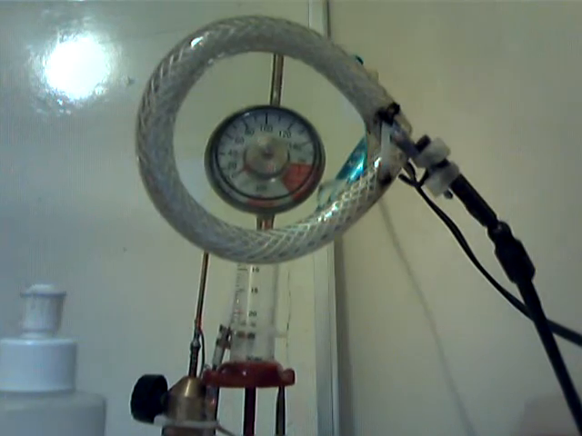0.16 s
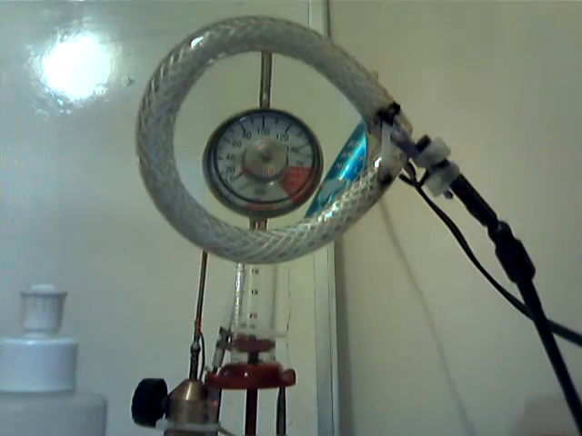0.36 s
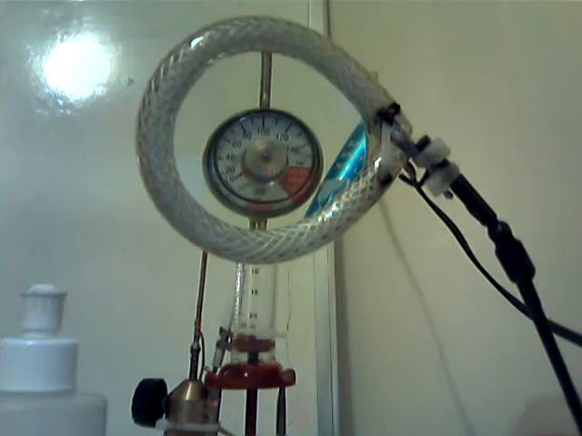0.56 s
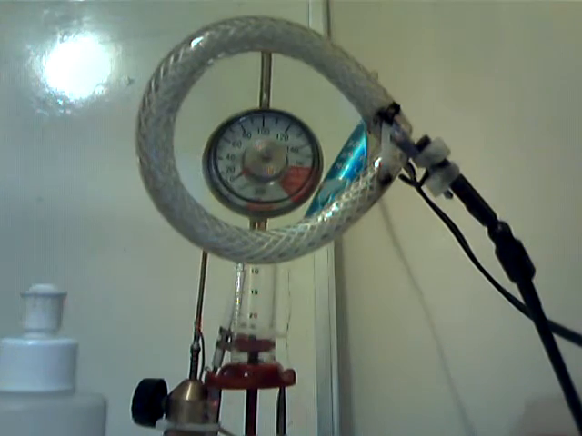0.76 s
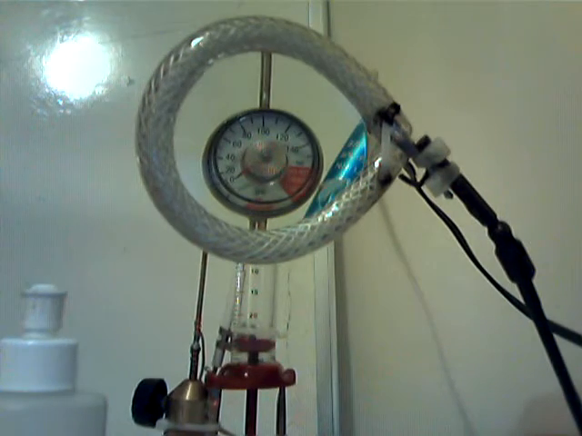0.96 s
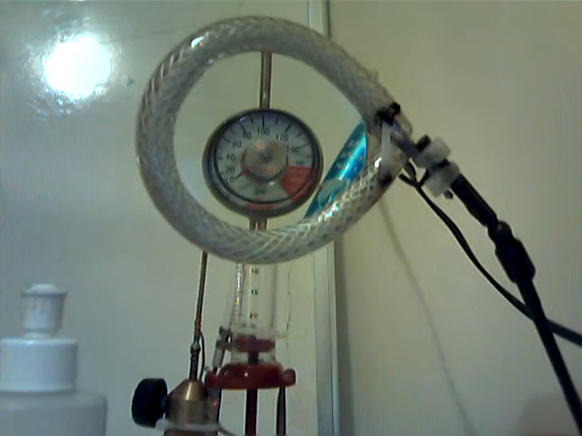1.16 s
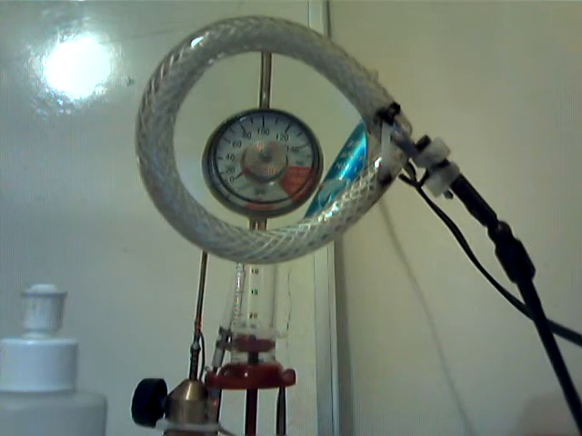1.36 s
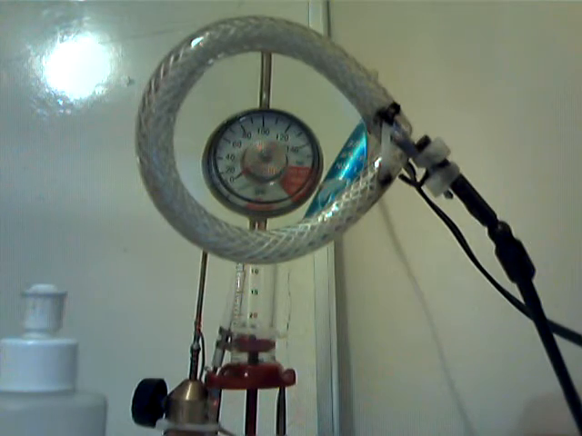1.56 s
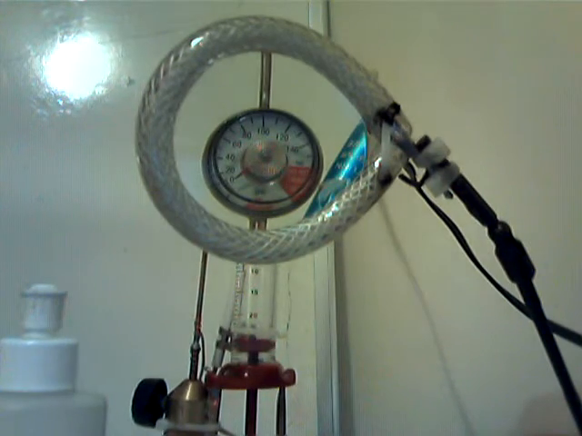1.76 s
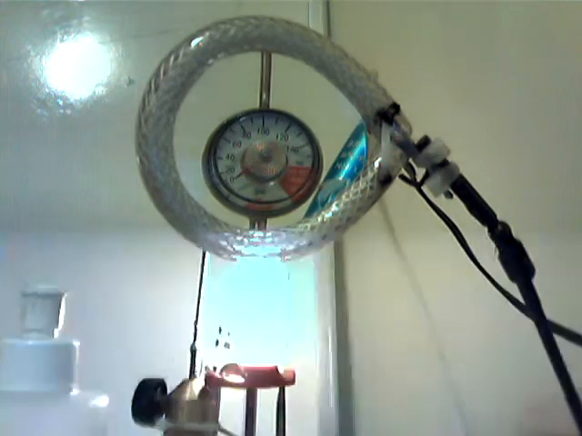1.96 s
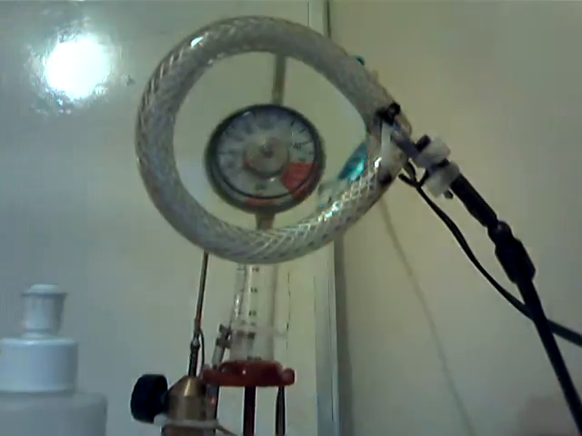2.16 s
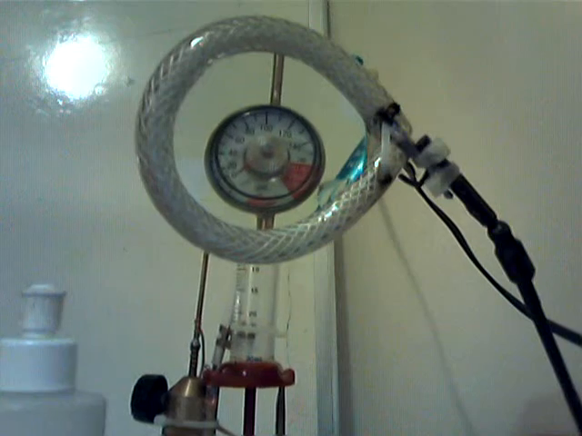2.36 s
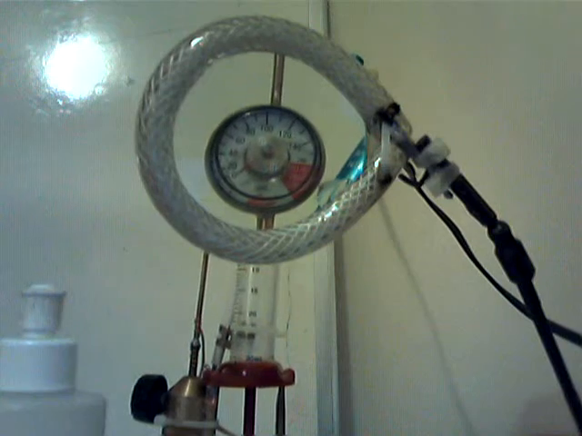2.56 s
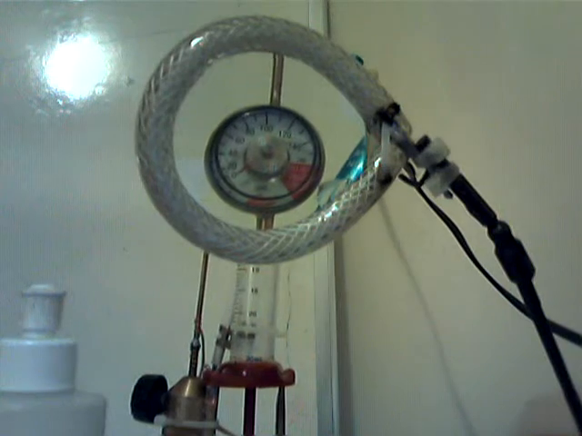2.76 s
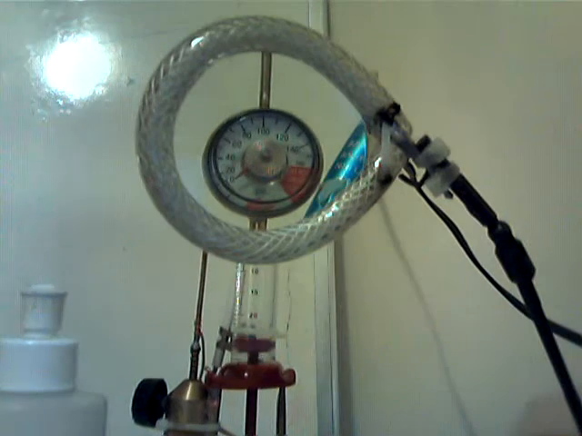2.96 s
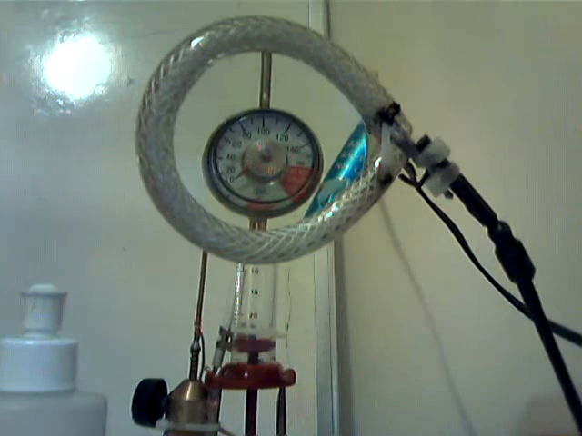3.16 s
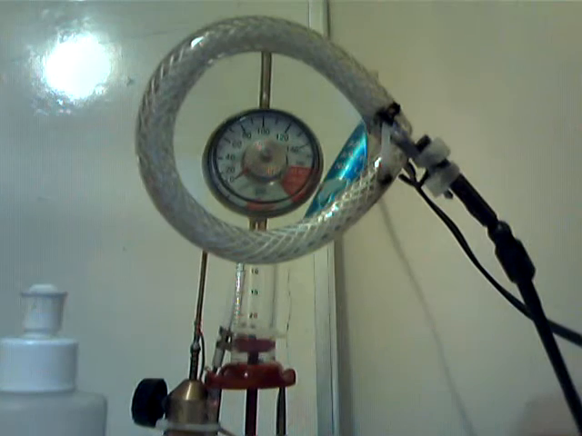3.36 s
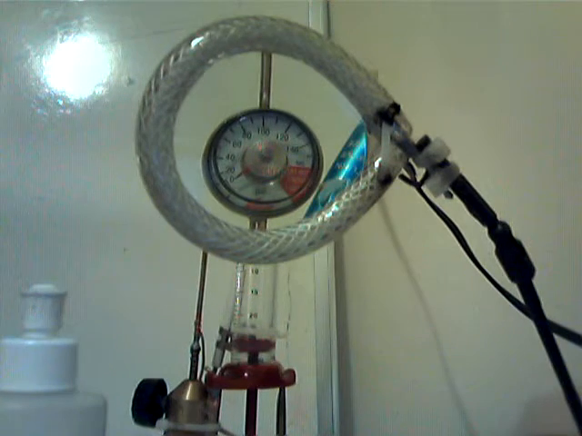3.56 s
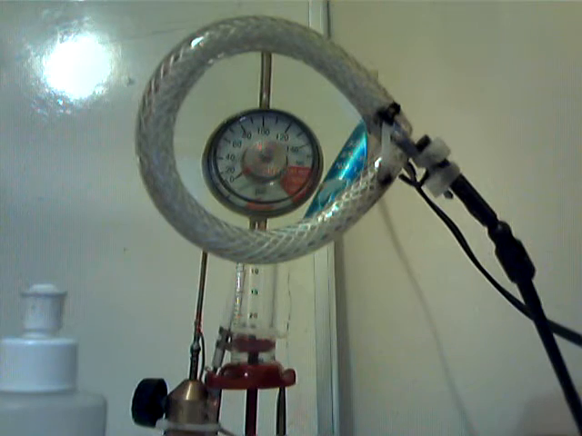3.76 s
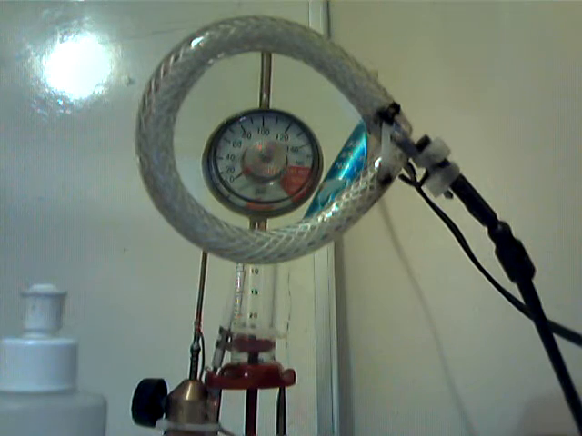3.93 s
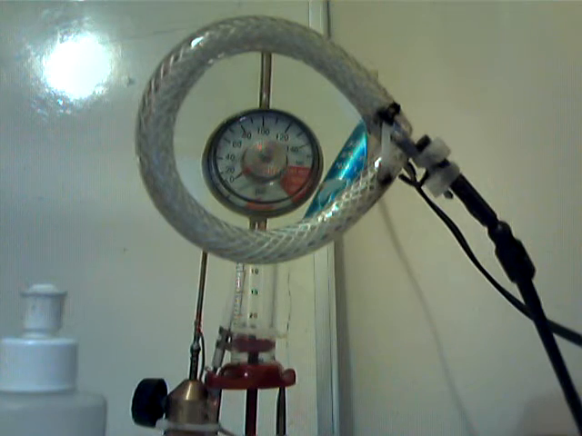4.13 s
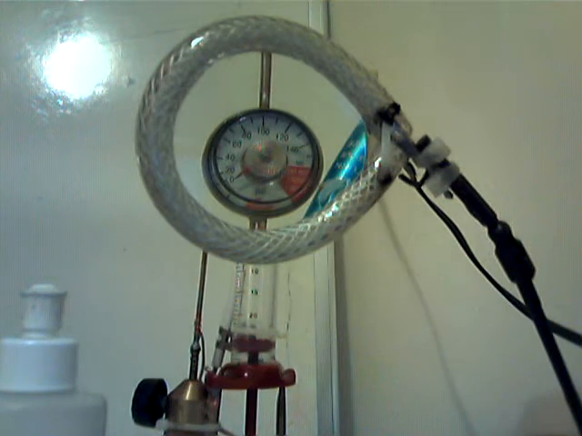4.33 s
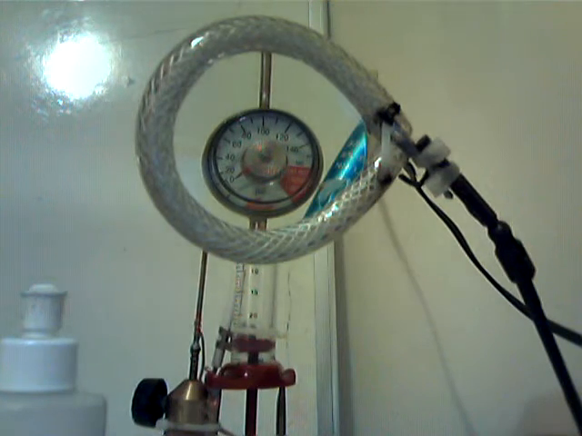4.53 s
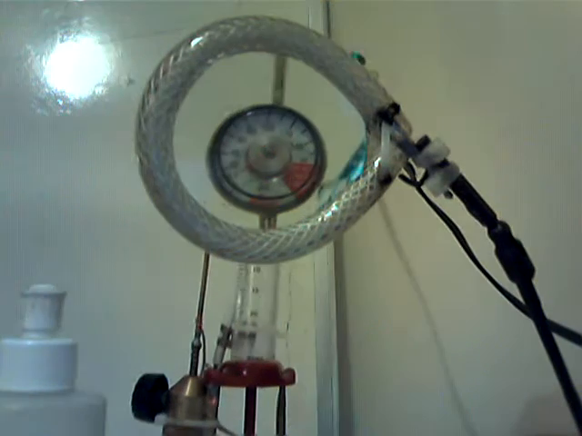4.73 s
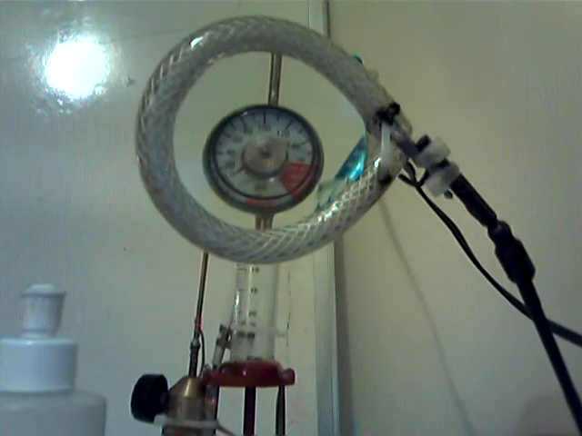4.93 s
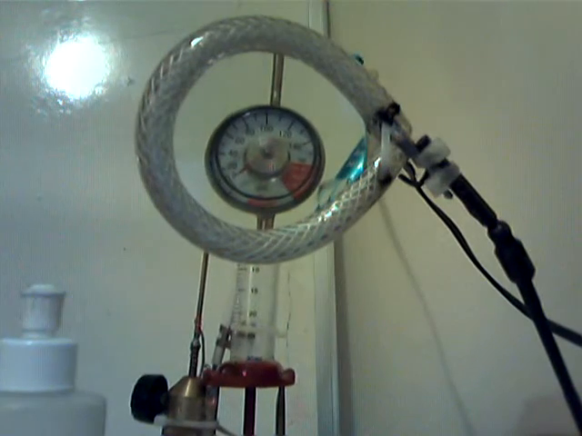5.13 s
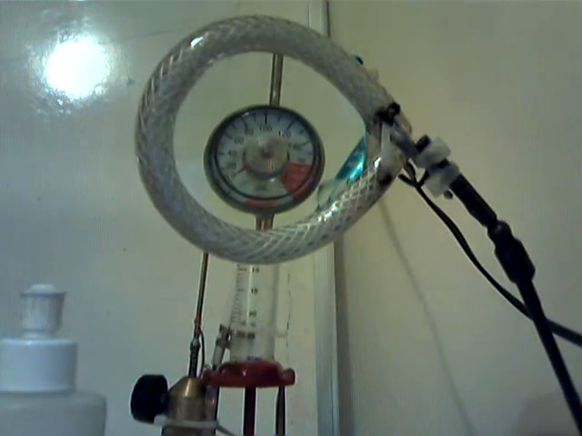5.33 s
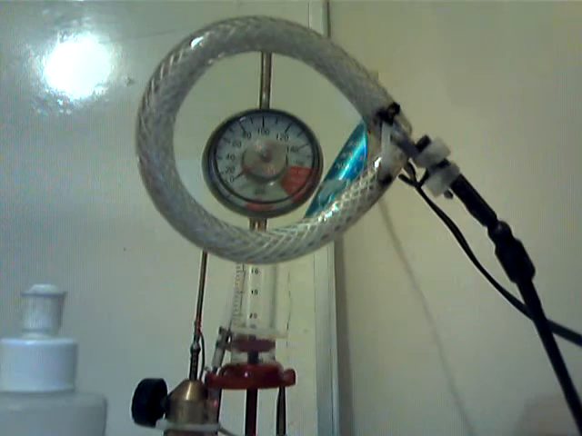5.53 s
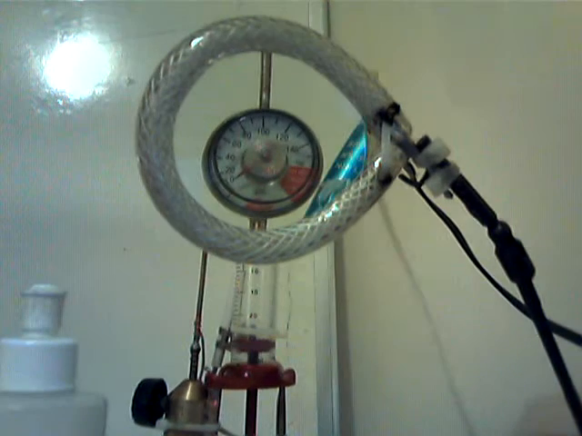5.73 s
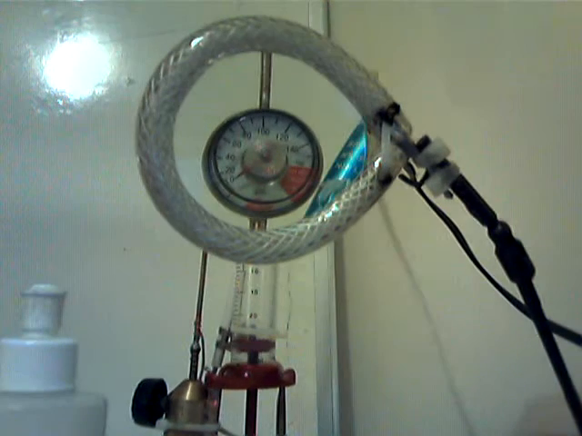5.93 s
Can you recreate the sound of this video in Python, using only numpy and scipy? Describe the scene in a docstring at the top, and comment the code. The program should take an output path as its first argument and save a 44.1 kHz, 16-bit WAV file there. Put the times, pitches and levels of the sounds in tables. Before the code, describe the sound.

A small, hard-walled workshop, heard through a cheap microphone very near the bench. From 0 s a fan gives a low steady hum around 140 Hz and its multiples, with surging airy rush, brief wavering mid-pitched whines and faint patchy hiss; a soft hissing spurt comes near 0.55 s. At 2.13 s a tiny spark snap merges into a violent gas bang, flattened and crackling with overload, with a low heave and a ringing metal stand. Fine bright rattling and loose ticks run through the decay. At 2.47 s a sharp spit and catch sound, then at 2.53 s a hollow, heavy clack bounces several times, ever quicker and softer. Resonance and hiss fade over the hum. Everything repeats identically: spurt near 3.15 s, bang at 4.73 s, clatter from 5.07 to about 5.25 s, fading until an abrupt cut to silence at 5.62 s.

```python
"""A workshop: a small gas charge fires in a syringe-like test chamber, close to a cheap microphone that overloads.
A fan motor hums and whines behind it (sine lines, shaped noise), and the piston seal hisses (patchy noise).
The blast is a noise burst that rings the stand (decaying sines) and rattles the fittings (noise taps).
A third of a second later the piston is sucked back and clatters home (clicks and thuds with reflections).
The same 2.6 s plays in a loop until the sound stops."""
import sys
import numpy as np
from scipy import signal
from scipy.fft import rfft, irfft
from scipy.io import wavfile
from scipy.ndimage import uniform_filter1d

SR = 44100
rng = np.random.default_rng(int(sys.argv[2]) if len(sys.argv) > 2 else 0)


def unload_wav(signal):
    """Save mono or channel-first audio to the path in sys.argv[1] as 16-bit WAV at rate SR, clipped to [-1, 1]."""
    wavfile.write(
        sys.argv[1],
        SR,
        np.round(np.clip(np.atleast_2d(signal).T, -1, 1) * 32767).astype(np.int16),
    )


N = 268569

LOOP_S, STOP_S = 2.6, 5.619
TOP_HZ, SPLATTER_TOP_HZ = 7500, 15800  # microphone band, and band of the final clipping
L = round(LOOP_S * SR)
T = np.arange(L) / SR
SPARK_S, FIRE_S, CATCH_S = 2.1268, 2.1295, 2.4708


def undb(db):
    """Decibels to gain."""
    return 10 ** (np.asarray(db) / 20)


def unit(x):
    """Scale to rms 1."""
    return x / np.sqrt(np.mean(x ** 2))


def noise():
    """One loop of white noise."""
    return rng.standard_normal(L)


def since(s):
    """Time since an event, around the loop."""
    return (T - s) % LOOP_S


def fade(age, t60):
    """Exponential decay by 60 dB in t60 seconds."""
    return np.exp(-np.log(1000) * age / t60)


def build(age, time_s):
    """Exponential rise from 0 towards 1."""
    return 1 - np.exp(-age / time_s)


def curve(rows):
    """Gain that follows (s, dB) rows around the loop."""
    s, db = np.transpose(rows)
    return undb(np.interp(T, s, db, period=LOOP_S))


def convolve(x, h):
    """Convolution whose tail wraps around the loop."""
    return irfft(rfft(x) * rfft(h), L)


def low_pass(x, hz):
    """Steep low-pass."""
    sos = signal.ellip(8, .3, 75, hz, fs=SR, output="sos")
    return signal.sosfilt(sos, x)


def response(points):
    """Causal impulse response of unit energy with the given (Hz, dB) colour."""
    hz, db = np.transpose(points)
    f = np.maximum(np.fft.rfftfreq(L, 1 / SR), 1)
    gain = undb(np.interp(np.log(f), np.log(hz), db))
    # folding the cepstrum gives minimum phase: all the energy comes early
    cepstrum = irfft(np.log(gain), L)
    cepstrum[1:L // 2] *= 2
    cepstrum[L // 2 + 1:] = 0
    h = low_pass(irfft(np.exp(rfft(cepstrum)), L), TOP_HZ)
    return h / np.linalg.norm(h)


def band(hz, width_hz):
    """Noise in one resonance, width_hz wide at half amplitude, rms 1."""
    f = np.fft.rfftfreq(L, 1 / SR)
    gain = 1 / (1 + (2 * (f - hz) / width_hz) ** 2)
    return unit(irfft(rfft(noise()) * gain, L))


def ring(modes, age):
    """Sum of struck modes: decaying sines from (Hz, dB, t60 s) rows."""
    return sum(undb(db) * fade(age, t60) * np.sin(2 * np.pi * hz * age) for hz, db, t60 in modes)


def room(t60, build_s):
    """Diffuse reflections of unit energy that build up and die away."""
    h = noise() * fade(T, t60) * build(T, build_s)
    return h / np.linalg.norm(h)


def patchy(x, depth_db, size=13):
    """Let narrow patches of a noise swell and sink, each for about a tenth of a second."""
    cells = signal.stft(x, nperseg=1024, noverlap=768)[2]
    field = rng.standard_normal(cells.shape)
    for _ in range(2):
        field = uniform_filter1d(field, size=3, axis=0)  # across frequency
        field = uniform_filter1d(field, size=size, axis=1)  # along time
    shaped = cells * undb(depth_db * unit(field))
    return signal.istft(shaped, nperseg=1024, noverlap=768)[1][:L]


def swells(rows, rest_db):
    """Gain that rests low and, for each (start, length, dB) row, rises, holds and falls."""
    attack_s, release_s = .02, .025
    gain = undb(rest_db)
    for s, length, db in rows:
        rise = np.clip((T - s) / attack_s + .5, 0, 1)
        fall = np.clip((s + length - T) / release_s + .5, 0, 1)
        gain = np.hypot(gain, undb(db) * rise * fall)
    return gain


# motor lines of the fan [f/Hz, level/dB before the slow swell]
MOTOR_LINES = [(140, -54.5), (280, -55), (345, -62.5), (420, -56), (490, -74), (560, -60.5)]


def motor_hum():
    """Steady motor lines that waver together in pitch and swell together in level."""
    wobble = 0.22 * band(0, 3.5)  # radians at the lowest line
    lowest_hz = MOTOR_LINES[0][0]
    hum = 0
    for hz, db in MOTOR_LINES:
        phase = 2 * np.pi * (hz * T + rng.random()) + wobble * hz / lowest_hz
        hum = hum + undb(db) * np.sin(phase)
    return hum * undb(0.97 * band(0, 9) - 1.0)


# colour of the fan's air noise [f/Hz, relative level/dB per Hz]
AIR_COLOUR = [(25, -18), (60, -9), (130, -2), (200, -11), (350, -9.5), (600, -0.5), (1000, -3.5),
              (1500, -8), (2200, -13.5), (3500, -20.5), (7000, -24), (8000, -28)]


def fan_air():
    """Turbulent air: coloured noise with unsteady patches."""
    air = patchy(convolve(noise(), response(AIR_COLOUR)), depth_db=2.6)
    return undb(-53.0) * unit(air)


# rise and fall of the fan's low rush [t/s, level/dB before a fixed trim]
RUSH_LEVEL = [(0.14, -55.5), (0.574, -57), (0.59, -58), (0.79, -51.5), (0.878, -59), (0.926, -55.5),
              (1.062, -51.5), (1.078, -60), (1.242, -52.5), (1.29, -64), (1.362, -54), (1.514, -61),
              (1.546, -53.5), (1.822, -49.5), (1.844, -58), (2.09, -49.5)]


def fan_rush():
    """Low band of air noise that surges and drops."""
    return curve(RUSH_LEVEL) * undb(-3.5) * band(360, 260)


# swells of the fan's whine [start t/s, length t/s, level/dB]
WHINE_SWELLS = [(.12, 0.11, -50.5), (.205, 0.15, -44.5), (.414, 0.054, -51), (.516, 0.064, -45.5),
                (.845, .11, -50), (1.305, 0.06, -49), (1.54, 0.15, -49.5), (1.875, .075, -50),
                (1.955, .165, -46)]
# swells of its upper resonance [start t/s, length t/s, level/dB before a fixed trim]
OVERTONE_SWELLS = [(.19, 0.12, -54), (.57, 0.089, -56.5)]


def fan_whine():
    """Wavering whine, a broad and a narrow noise resonance together, with a weak upper resonance."""
    tone = undb(-3.0) * band(850, 135) + undb(-5.5) * band(845, 25)
    whine = swells(WHINE_SWELLS, rest_db=-57) * tone
    overtone = swells(OVERTONE_SWELLS, rest_db=-70) * undb(-5.0) * band(1875, 110)
    return whine + overtone


def seep():
    """Gas at the piston seal: faint uneven hiss, one soft spurt, and a sharp spit on the way back."""
    hiss = patchy(undb(-3) * band(4400, 1400) + band(6200, 1900), depth_db=4.5)
    hiss = undb(-54.5) * unit(hiss) * fade(since(2.3), 2.6)
    spurt_age = since(0.555)
    spurt = undb(-8) * band(4340, 700) + band(6600, 2100)
    spurt = undb(-52) * spurt * fade(spurt_age, 0.26) * build(spurt_age, 0.0049)
    spit_age = since(CATCH_S)
    spit_gain = undb(-14.5) * fade(spit_age, 0.0076) + undb(-37.5) * fade(spit_age, 0.11)
    return hiss + spurt + band(6550, 1600) * spit_gain


# colour of the explosion [f/Hz, relative level/dB]
BLAST_COLOUR = [(30, -6), (100, -13.5), (170, -12), (250, 2), (450, -16.5), (700, -2), (900, 6), (1350, 0),
                (2000, -6.5), (3500, -10), (5500, -10), (7000, -11.5), (8000, -16)]
# ring of chamber and stand [f/Hz, relative level/dB, t60/s]
STAND_MODES = [(66.15, -8.5, 0.32), (132, 2, 0.35), (175.3, -12.5, 0.26), (221, -5.5, 0.27),
               (244.2, -3.5, 0.28), (414, -10, 0.093), (890, -7.5, 0.082), (886, 4.5, .22),
               (940, -12, 0.35), (980, -15, 0.2), (1100, -11, .29), (1167, -9, .26), (1406, -5, .25),
               (1710, -15, .17), (3205, -15, 0.082), (6200, -17.5, 0.17)]


def blast():
    """The spark snaps, the gas explodes, the stand rings and the air heaves once."""
    age, spark_age = since(FIRE_S), since(SPARK_S)
    spark = undb(-9.5) * band(6900, 1400) * fade(spark_age, 0.23) * build(spark_age, 0.0015)
    # the direct burst, then the walls throw it back
    burst = fade(age, 0.17) + undb(-14.5) * fade(since(FIRE_S + .033), 0.39)
    roar = convolve(noise() * burst, response(BLAST_COLOUR))
    stand = undb(-3.0) * ring(STAND_MODES, age) * build(age, 0.039)
    # the overpressure leaks away slowly
    heave = 1.1 * fade(age, .16) * build(age, .008)
    return spark + roar + stand + heave


# colour of a hard, bright contact, shared by rattle and knocks [f/Hz, relative level/dB]
CLICK_COLOUR = [(200, -32.5), (1000, -9), (2100, 0), (2450, -7), (2900, 0), (3600, -8.5), (4300, -8),
                (4800, -8), (5600, 0.5), (6900, 4), (8000, -6.5)]


def rattle():
    """Loose fittings go on chattering finely after the blast: random taps, each a bright click."""
    taps = (rng.random(L) < 190 / SR) * noise()  # about 190 a second
    shaking = fade(since(FIRE_S), 1.0)
    tick = response(CLICK_COLOUR)
    tick = tick + convolve(tick, room(0.035, .001))
    return undb(-31.5) * convolve(unit(taps) * shaking, tick)


# the piston hits an end stop and bounces, going out and coming home
# [t/s, first gap t/s, first click level/dB, first rebound click level/dB, first thud level/dB,
#  thud loss per bounce level/dB, lowest thud f/Hz]; levels relative
END_STOPS = [(2.1410, .0201, 4.5, -8, 3.5, 2.5, 151.7), (2.5280, .0220, -1.5, -21.5, 4, 3, 105)]
# the piston catches in the barrel on its way back
# [t/s, relative click level/dB, relative thud level/dB, lowest thud f/Hz]
BARREL_CATCHES = [(2.4708, -5.5, -9, 470), (2.4975, -24.5, 2.5, 374)]
# the loudest ticks of the shaken fittings [t/s, relative click level/dB]
FITTING_TICKS = [(2.2290, -12), (2.2962, -13.5), (2.3171, -21), (2.3396, -15.5), (2.3677, -21.5),
                 (2.3790, -20.5), (2.3980, -22.5), (2.4446, -16)]


def contacts():
    """Every contact as (s, click dB, thud dB, lowest Hz); bounces come ever sooner and softer."""
    bounce_count, gap_ratio, click_loss_db = 5, .85, 0.5  # ratio and loss from one bounce to the next
    tick_thud_db, tick_low_hz = -14.5, 424  # a tick's thud, relative to its click
    rows = list(BARREL_CATCHES)
    rows += [(s, db, db + tick_thud_db, tick_low_hz) for s, db in FITTING_TICKS]
    for s, gap, first_db, rebound_db, thud_db, loss_db, low_hz in END_STOPS:
        for k in range(bounce_count):
            click_db = rebound_db - k * click_loss_db if k else first_db
            rows.append((s, click_db, thud_db - k * loss_db, low_hz))
            s = s + gap * gap_ratio ** k
    return rows


# colour of a hollow thud [f/Hz, relative level/dB]
THUD_COLOUR = [(50, -34.5), (130, -5.5), (220, -10.5), (350, 0.5), (580, -0.5), (850, 6), (1150, -2.5),
               (1420, -2), (1850, -21.5), (3000, -19.5), (6000, -40)]
# short ring of the metal fittings [f/Hz, relative level/dB, t60/s]
FITTING_MODES = [(2070, 0, 0.37), (2420, -2, 0.21), (2900, -4.5, .14), (3070, -0.5, .1), (4080, -4.5, .2),
                 (5700, -4.5, 0.14), (6230, -7.5, 0.22), (7020, -3.5, 0.089)]
# resonances of the piston and barrel [f/Hz, relative level/dB, t60/s]
BARREL_MODES = [(142.1, -9, 0.21), (330, -1.5, 0.22), (388.4, -7, 0.28), (573.5, -0.5, 0.21),
                (617, -7.5, 0.2), (795, -10, 0.11), (826, 1, 0.15), (963, -1.5, .16), (1320, -10, 0.052)]


def knocks():
    """Each contact gives a bright click and a hollow thud; both fill the small room."""
    clicks, thuds = np.zeros(L), np.zeros(L)
    for s, click_db, thud_db, low_hz in contacts():
        start = round(s * SR)
        # a hard contact chatters for a few milliseconds, differently each time
        chatter = noise() * fade(T, 0.0084)
        clicks += undb(click_db) * np.roll(chatter, start) / np.linalg.norm(chatter)
        # only a blow that moves the whole stand reaches down into the bass
        high_pass = signal.butter(5, low_hz, "high", fs=SR, output="sos")
        push = signal.sosfilt(high_pass, signal.unit_impulse(2048))
        thuds[(start + np.arange(len(push))) % L] += undb(thud_db) * push
    click, thud = response(CLICK_COLOUR), response(THUD_COLOUR)
    click_room = undb(-6) * convolve(click, room(0.22, 0.0013))
    click = click + click_room + undb(-44.5) * ring(FITTING_MODES, T)
    # the bench and the wall just behind answer first, then the room
    reflections = undb(-1.5) * room(0.032, 0.00045) + undb(-2) * room(0.24, 0.014)
    thud_room = convolve(thud, reflections)
    thud = undb(-3.0) * thud + thud_room + undb(-34.0) * ring(BARREL_MODES, T)
    return undb(6.0) * convolve(clicks, click) + undb(11.0) * convolve(thuds, thud)


def scene():
    """One loop of fan, seal, blast, rattle and knocks, repeated."""
    fan = motor_hum() + fan_air() + fan_rush() + fan_whine()
    loop = fan + seep() + blast() + rattle() + knocks()
    return np.resize(loop, N)[None]


def record(dry):
    """The microphone overloads lopsidedly, loses its top and clips once more at full scale."""
    ceiling = np.where(dry > 0, .76, .785)  # full scale = 1
    squashed = dry / (1 + (dry / ceiling) ** 4) ** (1 / 4)
    # a long overload drags the resting point down, so the troughs reach full scale first
    sag_s, sag_onset, sag_depth = .032, .014, 4.6  # memory in seconds, threshold, depth
    leak = np.exp(-1 / (sag_s * SR))
    strain = signal.lfilter([1 - leak], [1, -leak], squashed ** 4)
    sagging = squashed - sag_depth * np.maximum(strain - sag_onset, 0)
    narrow = low_pass(sagging, TOP_HZ)
    playing = np.arange(N) / SR < STOP_S
    return low_pass(np.clip(narrow, -1, 1) * playing, SPLATTER_TOP_HZ)


dry = scene()
out = record(dry)
unload_wav(out)
```